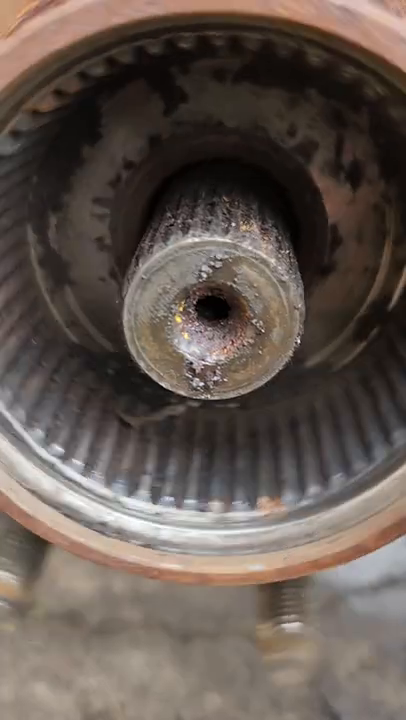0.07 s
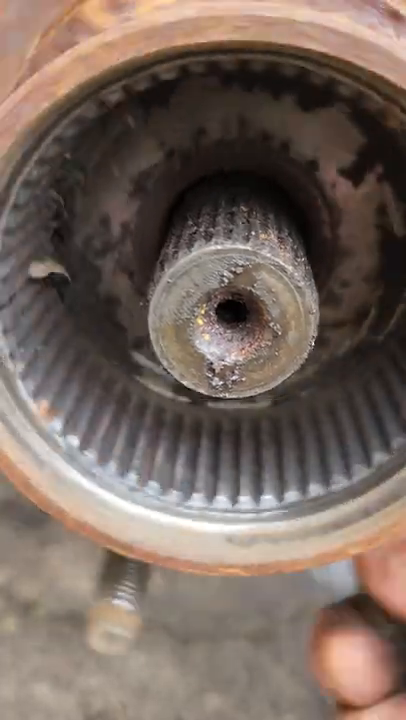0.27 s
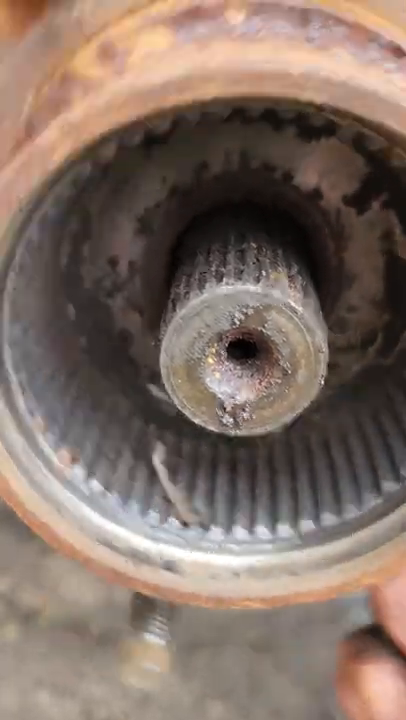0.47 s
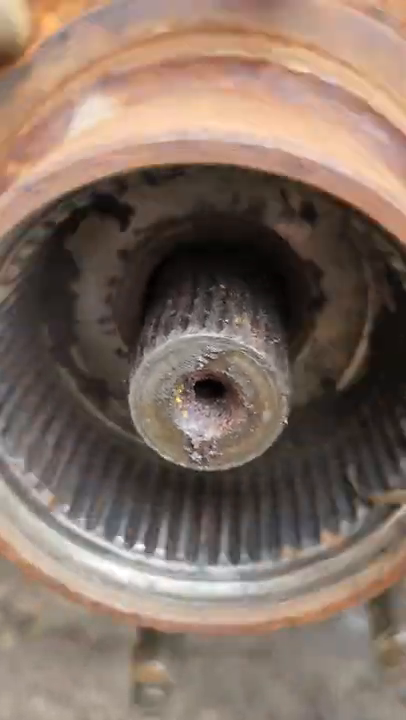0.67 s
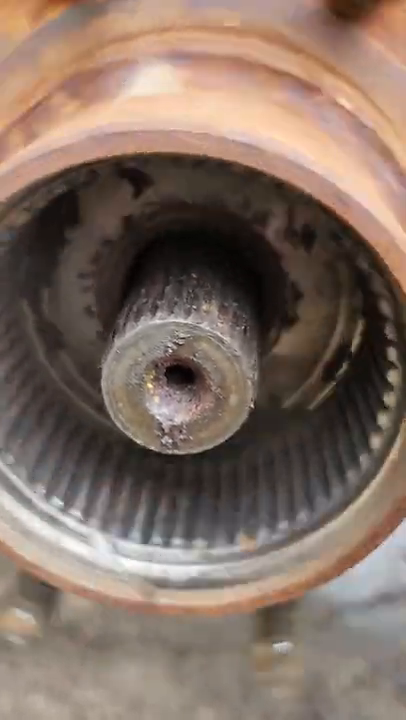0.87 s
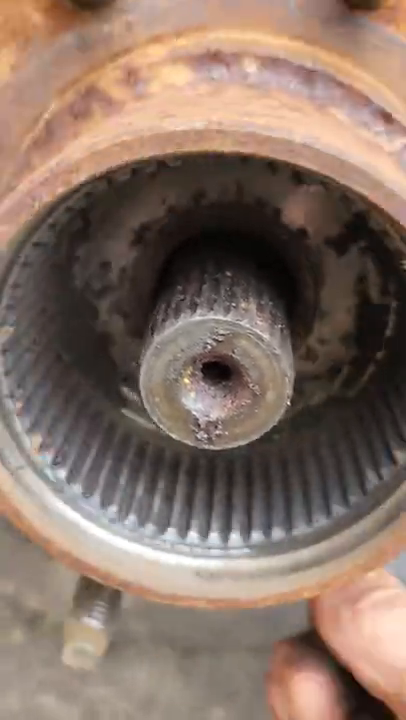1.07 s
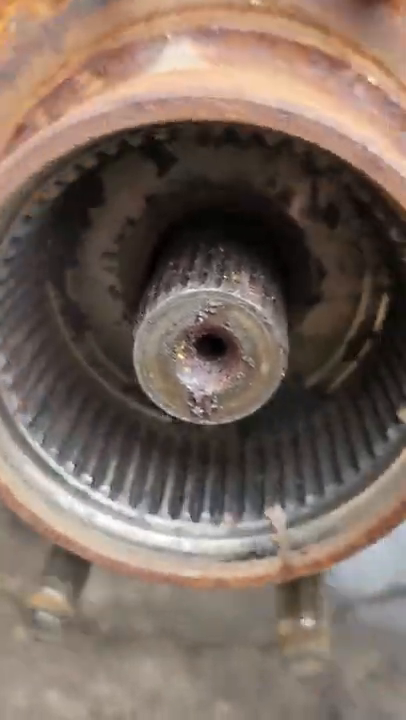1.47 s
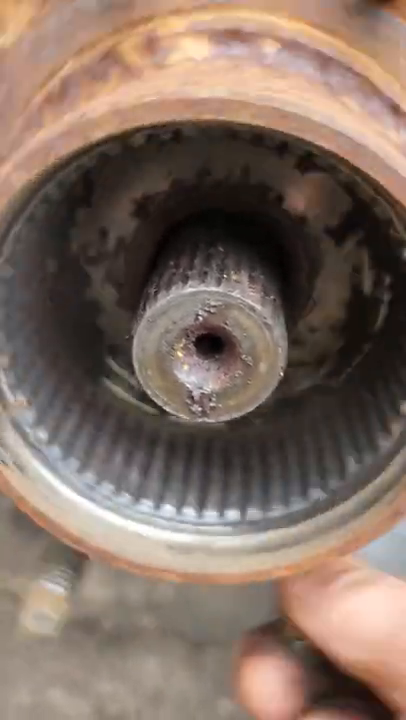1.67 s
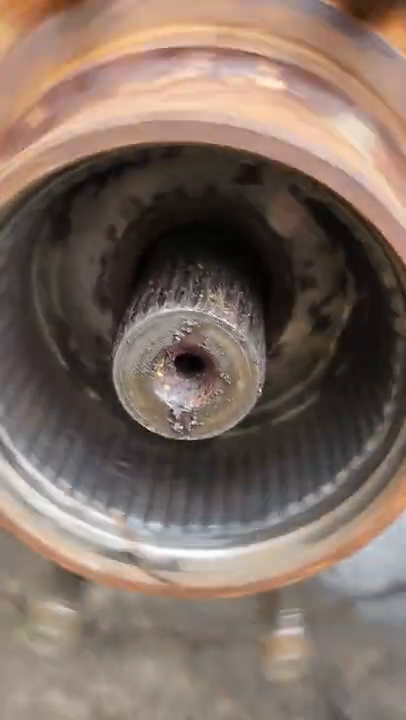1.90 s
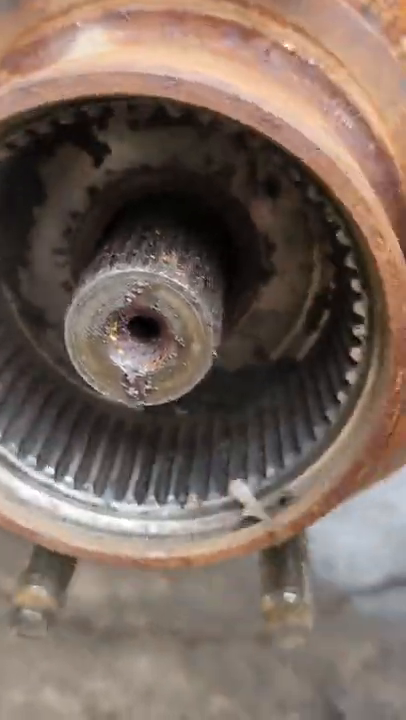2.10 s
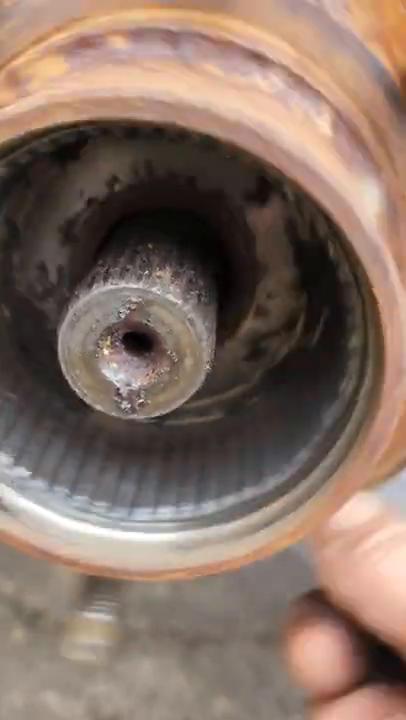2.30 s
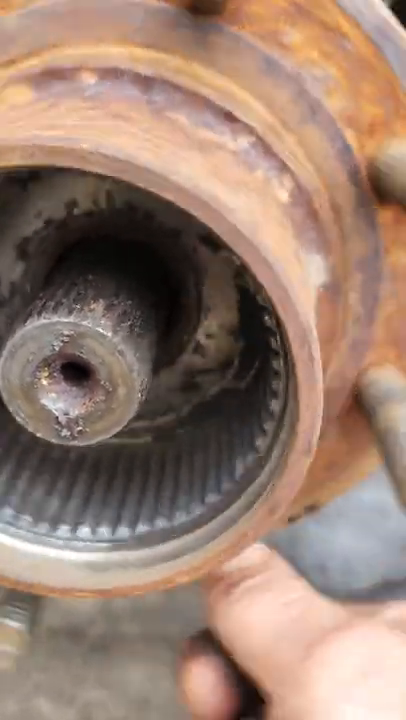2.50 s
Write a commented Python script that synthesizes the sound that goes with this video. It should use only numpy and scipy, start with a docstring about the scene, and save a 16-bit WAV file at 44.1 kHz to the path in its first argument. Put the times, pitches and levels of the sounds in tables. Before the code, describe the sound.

A rusty wheel hub grinds on its axle in about ten short, gritty strokes, close up. It starts softly, with sharp snaps around 0.3 seconds and a dull knock at 0.6. Steel clacks cluster near 1.1 seconds, ringing briefly. Scraping strokes continue with small clinks and knocks, then a quick chatter at 2.3 before easing off. A low, steady workshop rumble lies underneath.

```python
"""In a workshop, close to a stereo microphone, a rusty wheel hub is rocked by hand on its axle.
Each stroke crushes rust grains against the steel. Play in the joint knocks dully and chatters,
splines clink, rust flakes snap, and the hardest clacks leave the hub ringing.
The low, steady rumble of the room lies behind it all."""
import sys
import numpy as np
from scipy import signal
from scipy.fft import rfft, irfft
from scipy.io import wavfile

SR = 44100
rng = np.random.default_rng(int(sys.argv[2]) if len(sys.argv) > 2 else 0)


def materialize(psi):
    """Save the field psi as 16-bit PCM at rate SR to the path in sys.argv[1].

    A 1-D psi becomes a single channel; in a 2-D psi each row is a channel.
    """
    bounded = np.clip(np.atleast_2d(psi).T, -1, 1)
    quanta = np.round(bounded * 32767).astype(np.int16)
    wavfile.write(sys.argv[1], SR, quanta)


N = 116865

# strokes of the hand (start [s], full pressure [s], let go [s], steel body [dB], grit [dB], roll [dB])
STROKES = [(-.05, 0, .03, -40.5, -47.5, -52), (0.205, 0.236, 0.36, -34.5, -42.5, -41),
           (0.36, 0.395, 0.51, -39.5, -54.5, -52), (0.537, 0.661, .78, -29.5, -35, -34),
           (0.883, 0.99, 1.103, -30.5, -37.5, -39), (1.047, 1.06, 1.14, -29.5, -45, -34.5),
           (1.213, 1.433, 1.41, -29, -35, -34), (1.539, 1.67, 1.781, -28.5, -39, -41),
           (1.907, 1.96, 2.134, -35.5, -42, -33.5), (2.224, 2.354, 2.432, -30.5, -41, -42),
           (2.486, 2.667, 2.63, -38.5, -39.5, -43)]
# spectrum of fine rust grit (frequency [Hz], level [dB])
GRIT_SPECTRUM = [(1500, -1.5), (3200, -3.5), (3900, 6), (4900, 4.5), (6050, -7), (7050, 3.5), (7400, 8.5),
                 (7900, -1.5), (9200, -6), (13000, -4), (16000, -11)]
EDGE_HZ, EDGE_WIDTH_HZ = 3770, 600  # hard edge of knocks and clacks


def undb(db):
    """Decibels to gain."""
    return 10 ** (np.asarray(db) / 20)


def unit(x):
    """Scale to rms 1."""
    return x / np.sqrt(np.mean(x ** 2) + 1e-18)


def noise():
    """White noise."""
    return rng.standard_normal(N)


def on_bins(hz, values):
    """Spread points over all frequencies, on a log axis."""
    return np.interp(np.log(np.arange(N + 1) * SR / (2 * N) + 1), np.log(hz), values)


def colour(x, points):
    """Minimum-phase filter through (frequency [Hz], level [dB]) points."""
    cepstrum = irfft(np.log(undb(on_bins(*np.array(points).T))))
    response = np.exp(rfft(np.r_[cepstrum[0], 2 * cepstrum[1:N]], 2 * N))
    return irfft(rfft(x, 2 * N) * response)[:N]


def add(out, at, x):
    """Mix a short sound in at a time in seconds."""
    i = max(int(at * SR), 0)
    out[i:i + len(x)] += x[:max(N - i, 0)]


def burst(decay_s, hz, width_hz):
    """A dying crunch of noise in one resonance."""
    t = np.arange(SR // 10) / SR
    env = np.exp(-t / decay_s) * (1 - np.exp(-t / 0.00058)) ** 2
    peak = signal.iirpeak(hz, hz / (2 * width_hz), fs=SR)
    crunch = rng.standard_normal(len(t)) * env
    crunch = signal.lfilter(*peak, signal.lfilter(*peak, crunch))
    return unit(crunch) * np.sqrt(np.mean(np.exp(-2 * t / decay_s)))


def ping(hz, decay_s):
    """One struck mode."""
    t = np.arange(SR // 10) / SR
    return np.exp(-t / decay_s) * np.sin(2 * np.pi * hz * t)


def room_tone(mid_db=-43, width=0.15):
    """The workshop rumbles low and steady, nearly alike left and right."""
    # spectrum of the room (frequency [Hz], level [dB])
    spectrum = [(20, -22), (55, -1), (115, 1), (170, -5.5), (260, -14.5), (400, -13.5), (2000, -17.5),
                (3000, -31.5), (16000, -44)]
    mid, side = (unit(colour(noise(), spectrum)) for _ in range(2))
    return undb(mid_db) * (mid + width * np.array([side, -side]))


def spline_clinks(detune=0.012):
    """A spline catches and pings, a little differently at each tooth."""
    # light catches (time [s], level [dB])
    catches = [(.123, -36), (.442, -33.5), (.768, -20), (1.1, -26), (1.408, -28.5), (1.8, -28.5),
               (1.931, -30.5), (2.052, -28.5), (2.1, -30)]
    # short modes of the splines (frequency [Hz], level [dB])
    modes = [(2020, 2.5), (4170, 1), (7420, -9)]
    out = np.zeros(N)
    for at, db in catches:
        for hz, mode_db in modes:
            pitch = hz * (1 + detune * rng.standard_normal())
            add(out, at, undb(db + mode_db) * ping(pitch, decay_s=0.0074))
    return out


def flake_snaps():
    """Rust flakes break: a broad crack with one bright region."""
    # breaking flakes (time [s], level [dB], decay [s], bright region [Hz])
    flakes = [(.241, -21.5, 0.0036, 4260), (0.2733, -16, 0.0028, 6540), (.297, -27.5, .004, 8200),
              (0.3261, -14, 0.00082, 4550), (0.75, -26.5, 0.02, 11360), (1.0705, -14.5, 0.013, 3720),
              (1.1133, -19, 0.0048, 3730), (1.2322, -23, 0.00049, 3540), (1.3648, -19, 0.00097, 13500),
              (1.6856, -15.5, 0.0023, 4760), (1.7097, -23, 0.0027, 7800), (1.898, -15.5, 0.00093, 4400),
              (2.175, -18, 0.00091, 4000), (2.409, -18, 0.0021, 4370)]
    focused, broad = np.zeros(N), np.zeros(N)
    for at, db, decay, hz in flakes:
        add(focused, at, undb(db) * burst(decay, hz, width_hz=850))
        add(broad, at, undb(db) * burst(decay, hz=10700, width_hz=10100))
    return 0.96 * focused + undb(1.5) * colour(broad, GRIT_SPECTRUM)


def knock(hz, rise_s=0.0011, decay_s=0.0017):
    """A soft contact swells for a cycle or two and is quickly damped."""
    t = np.arange(SR // 20) / SR
    env = (1 - np.exp(-t / rise_s)) ** 2 * np.exp(-t / decay_s)
    return env / env.max() * np.sin(2 * np.pi * hz * t)


def loose_joint(edge_db=-11.5, slips_per_s=160):
    """Play in the joint gives dull knocks with a hard edge, and runs of stick-slip chatter."""
    # single knocks (time [s], level [dB], pitch [Hz])
    knocks = [(0.245, -16, 1050), (0.274, -16, 1100), (.505, -27, 1050), (0.527, -17, 960),
              (0.6138, -9.5, 907), (0.618, -6, 1080), (1.0, -19.5, 920), (1.019, -6, 1165),
              (1.225, -19, 975), (1.261, -22.5, 1110), (1.443, -18, 1210), (1.553, -20, 1210),
              (1.576, -16.5, 1270), (1.687, -17.5, 1130), (1.869, -10, 950), (2.104, -18, 820),
              (2.3817, -11.5, 1120), (2.4349, -14.5, 1060), (2.529, -19, 960)]
    # runs of slips (time [s], length [s], level [dB], pitch [Hz])
    chatters = [(0.666, 0.035, -32.5, 940), (2.297, 0.061, -26.5, 1150)]
    out = np.zeros(N)
    for at, db, hz in knocks:
        add(out, at, undb(db) * knock(hz))
        add(out, at, undb(db + edge_db) * burst(0.0024, EDGE_HZ, EDGE_WIDTH_HZ))
    for at, length, db, hz in chatters:
        run = np.zeros(N)
        slips = rng.standard_normal((20, 3))[:int(length * slips_per_s)]
        for k, (late, size, detune) in enumerate(slips):
            slip = undb(2.9 * size) * knock(hz * (1 + 0.067 * detune))
            add(run, at + (k + 0.177 * late) / slips_per_s, slip)
        out += unit(run) * np.sqrt(length * SR / N) * undb(db)  # rms over the run's own length
    return out


def hub_ring(spread_db=4):
    """The struck hub rings on; each contact weights its modes differently."""
    # long modes of the hub (frequency [Hz], level [dB], time to fall 60 dB [s])
    modes = [(1211, -8.5, 0.77), (1402, 4.5, 0.15), (1660, 4.5, 0.26), (1867, -2, 0.21), (2026, -6, 0.41),
             (2220, -5, 0.22), (3114, -2.5, 0.33), (3800, -4, 0.21), (6565, -8, 0.26), (11530, -7.5, 0.077),
             (12300, -14, 0.25)]
    t = np.arange(SR // 2) / SR
    return sum(undb(db + spread_db * rng.standard_normal() - 60 * t / t60) * np.sin(2 * np.pi * hz * t)
               for hz, db, t60 in modes)


def steel_clacks(edge_db=-3.5, ring_db=-9, full_ring_s=0.013):
    """Steel meets steel: a short crunch, and the longer it lasts, the louder the hub rings."""
    # impacts (time [s], level [dB], decay [s], centre [Hz])
    impacts = [(0.2408, -14, 0.0037, 2240), (.36, -22, 0.0024, 1550), (0.397, -26, 0.0034, 2150),
               (0.527, -18.5, 0.0021, 2220), (0.766, -16.5, 0.0038, 1750), (0.954, -23.5, 0.0037, 2030),
               (1.02, -16.5, 0.002, 2030), (1.057, -20, 0.0058, 1690), (1.0697, -13.5, 0.0071, 1780),
               (1.0775, -11.5, 0.0086, 1700), (1.1007, -21.5, 0.0048, 1400), (1.1145, -10.5, 0.003, 1390),
               (1.142, -21.5, 0.0058, 1430), (1.3632, -19.5, 0.0029, 1650), (1.426, -19.5, 0.0041, 1710),
               (1.757, -25, 0.0085, 1570), (1.9582, -13.5, 0.0018, 1600), (2.411, -17.5, 0.0015, 2000)]
    out = np.zeros(N)
    for at, db, decay, hz in impacts:
        crunch = burst(decay, hz, width_hz=360)
        edge = undb(edge_db) * burst(decay, EDGE_HZ, EDGE_WIDTH_HZ)
        add(out, at, undb(db) * (crunch + edge))
        add(out, at, undb(db + ring_db) * decay / full_ring_s * hub_ring())
    return out


def hand_pressure(levels_db, fall_db_per_s=330, rise_db=15, onset_s=0.03):
    """Each stroke swells and dies away once the hand lets go; overlaps add in power."""
    t, power = np.arange(N) / SR, 0
    for (start, full, stop, *_), db in zip(STROKES, levels_db):
        swell_db = -rise_db * np.clip((full - t) / max(full - start, .002), 0, 1)
        release_db = -fall_db_per_s * np.maximum(t - stop, 0)
        onset = np.clip((t - start) / onset_s, 0, 1)
        power += (undb(db + swell_db + release_db) * onset) ** 2
    return np.sqrt(power)


def crushed_grains(per_s=5000, spread_db=5, judder_hz=109.25, judder_db=4):
    """Dense clicks of crushed rust, their level shaken by the judder of the contact."""
    knots = rng.standard_normal(N // 10)
    judder = np.interp(np.arange(N) / SR * judder_hz, np.arange(len(knots)), knots)
    size = undb(spread_db * np.minimum(rng.exponential(size=N), 5))
    clicks = (rng.random(N) < per_s / SR) * np.sign(noise())
    return clicks * size * undb(judder_db * judder)


def ringing_grains(per_s, low_hz, high_hz, spread_db=4.5):
    """Separate grains ring briefly as they break, each with its own pitch and size."""
    out = np.zeros(N)
    for when, pitch, size in rng.random((N // 20, 3))[:int(per_s * N / SR)]:
        db = spread_db * min(-np.log(1 - size), 3.5)
        hz = low_hz + pitch * (high_hz - low_hz)
        add(out, when * N / SR, undb(db) * ping(hz, decay_s=0.0028))
    return out


def rust_through_steel(crush):
    """Sandy crushing and ringing grains both sound through the hub's body."""
    # response of the steel body (frequency [Hz], level [dB])
    steel = [(450, -32.5), (760, 0), (1080, 2), (1450, 5.5), (1720, -1), (2300, -3), (2750, -10.5),
             (3250, -10), (3700, -6.5), (4200, -7), (4800, -10), (9000, -31)]
    # ringing rust crumbs (rate [1/s], lowest pitch [Hz], highest pitch [Hz])
    crumbs = (650, 644, 4700)
    sand = unit(colour(crush, steel))
    pings = unit(colour(ringing_grains(*crumbs), steel))
    return undb(-5) * sand + undb(-1.5) * pings


def grinding(ring_db=-23.5):
    """Under the hand, rust crunches, grit rasps, the bearing rumbles and the hub rings faintly."""
    # spectrum of the rolling bearing (frequency [Hz], level [dB])
    bearing = [(100, -3), (220, -12.5), (310, -1.5), (400, 2.5), (520, -12), (760, -1.5), (1100, -12),
               (3000, -47)]
    *_, body_db, grit_db, roll_db = np.array(STROKES).T
    crush, push = crushed_grains(), hand_pressure(body_db)
    body = rust_through_steel(crush) * push
    grit = unit(colour(crush + crushed_grains(), GRIT_SPECTRUM)) * hand_pressure(grit_db)
    roll = unit(colour(crushed_grains(), bearing)) * hand_pressure(roll_db, fall_db_per_s=202)
    ring = unit(signal.fftconvolve(crush * push, hub_ring())[:N])
    return body + grit + roll + ring * np.std(body) * undb(ring_db)


def close_microphone(x, scatter_hz=1060, bore_decay_s=0.00041, walls_t60_s=0.13, walls_db=-11):
    """Two close ports hear the direct sound, its scatter in the hub's bore and the workshop walls."""
    # microphone ports (frequency [Hz], left minus right [dB], phase lead of left [rad])
    ports = [(100, 1.5, -0.5), (1167, -1.5, 1.56), (1542, 1.5, 6), (1758, -7, 6.5), (3683, 2.5, 1),
             (4126, 2, 11), (5000, 11.5, 11.5), (8200, 7, 17.5), (9730, 14, 6.5), (13800, 3.5, 20.5)]
    hz, *columns = np.array(ports).T
    pan_db, lead = (on_bins(hz, column) for column in columns)
    t, bin_hz = np.arange(N) / SR, np.arange(N + 1) * SR / (2 * N)
    scatter = 0.79 * (1 - np.exp(-(bin_hz / scatter_hz) ** 2))  # treble scatters most
    tails = np.exp(-t / bore_decay_s), undb(-60 * t / walls_t60_s)
    channels = []
    for side in (1, -1):  # left, right
        bore, walls = (rfft(unit(noise() * tail), 2 * N) / np.sqrt(N) for tail in tails)
        direct = np.sqrt(1 - scatter ** 2) * np.exp(1j * lead * min(side, 0))
        path = direct + scatter * bore + undb(walls_db) * walls
        pan = np.sqrt(2 / (1 + undb(-2 * side * pan_db)))
        channels.append(irfft(rfft(x, 2 * N) * path * pan)[:N])
    return np.array(channels)


def scene():
    """The hub up close over room tone; a second, softer layer of it widens the stereo sound."""
    main = close_microphone(grinding() + loose_joint() + steel_clacks() + spline_clinks() + flake_snaps())
    widening = close_microphone(grinding() + steel_clacks() + spline_clinks() + flake_snaps())
    return undb(-1) * main + undb(-5.5) * widening + room_tone()


def record(dry, top_hz=16050):
    """The recorder clips at full scale and cuts the highest treble."""
    lowpass = signal.ellip(10, .2, 80, top_hz, fs=SR, output="sos")
    return signal.sosfilt(lowpass, np.clip(dry, -1, 1))


dry = scene()
out = record(dry)
materialize(out)
```